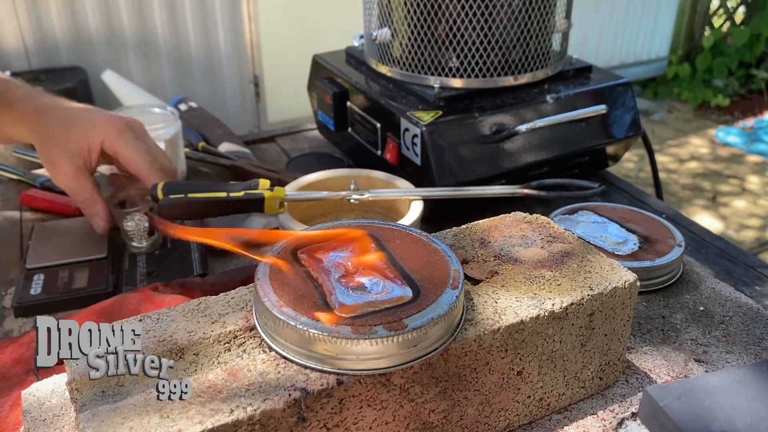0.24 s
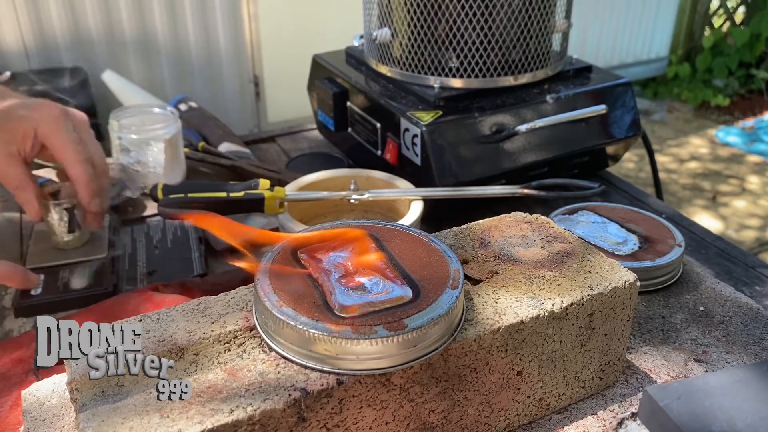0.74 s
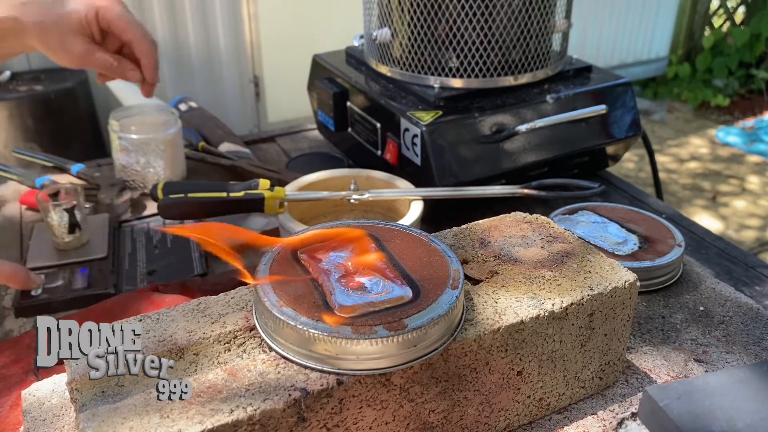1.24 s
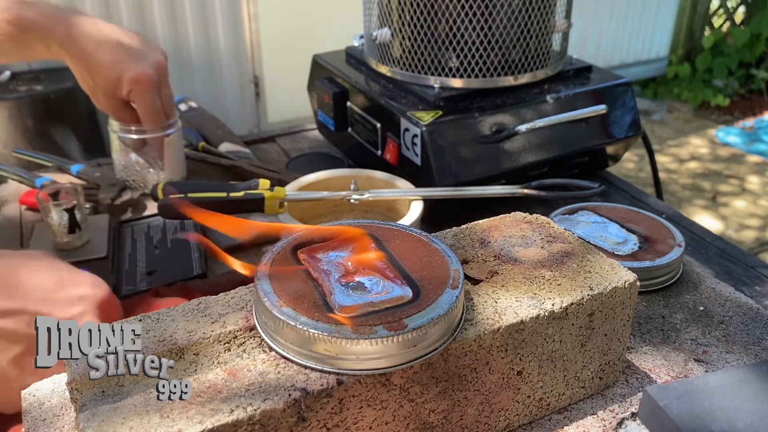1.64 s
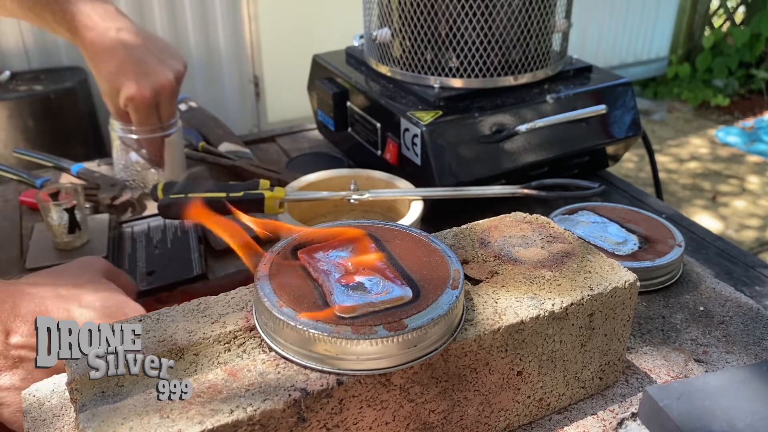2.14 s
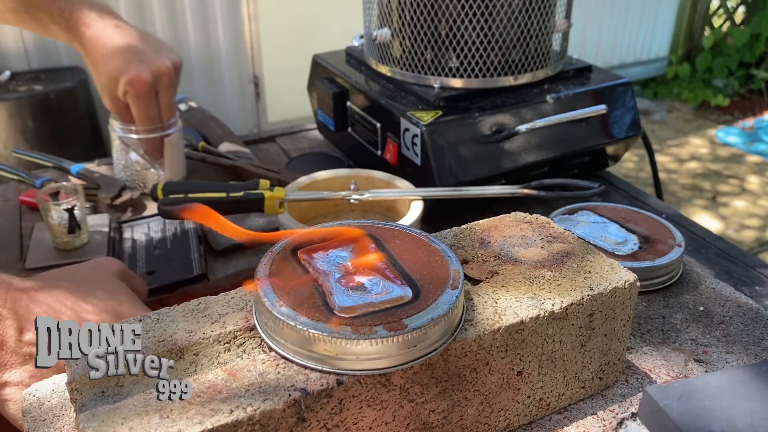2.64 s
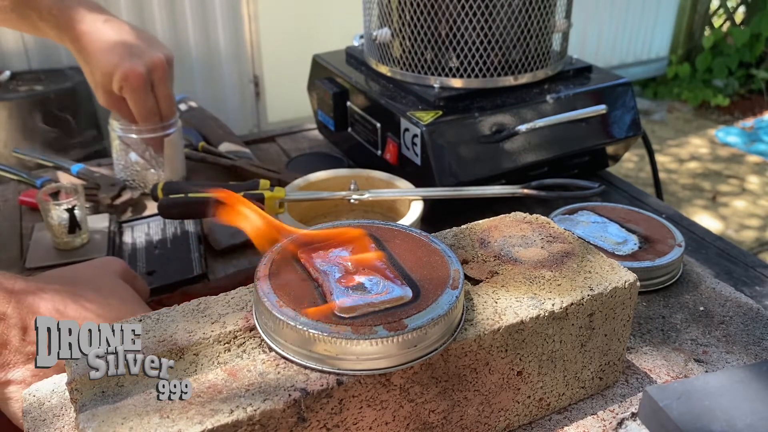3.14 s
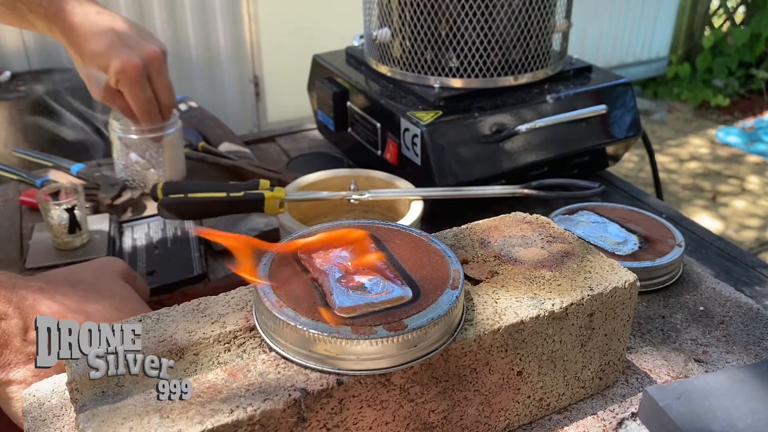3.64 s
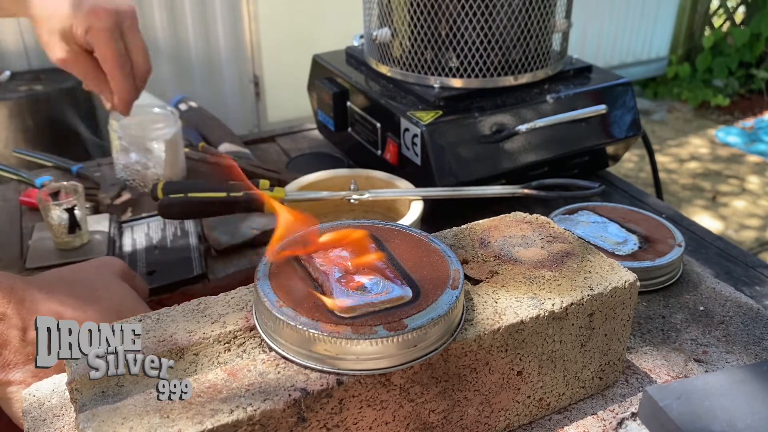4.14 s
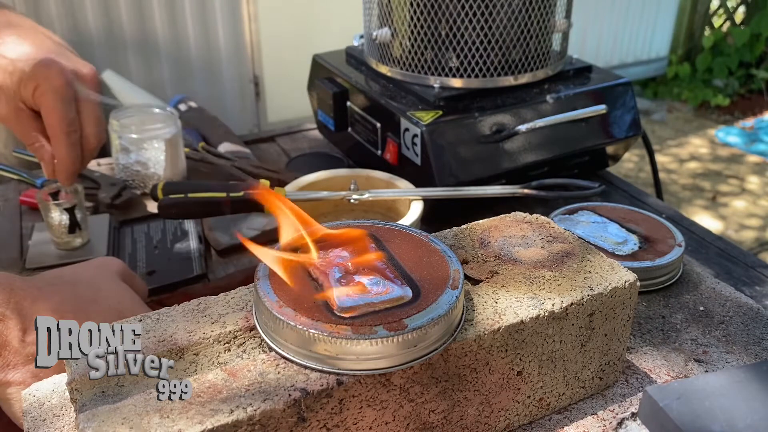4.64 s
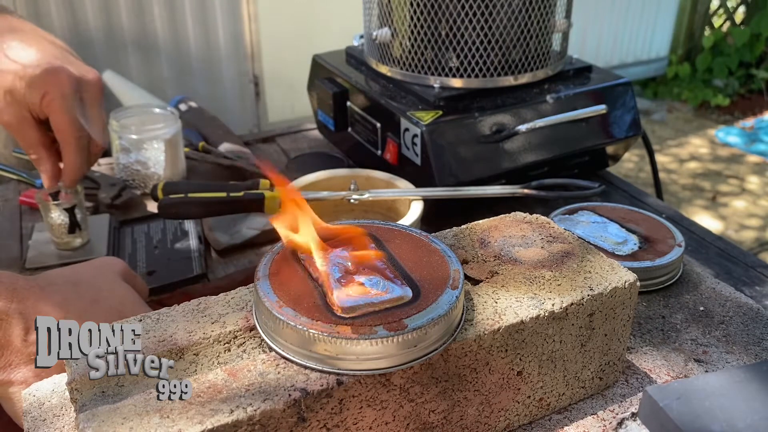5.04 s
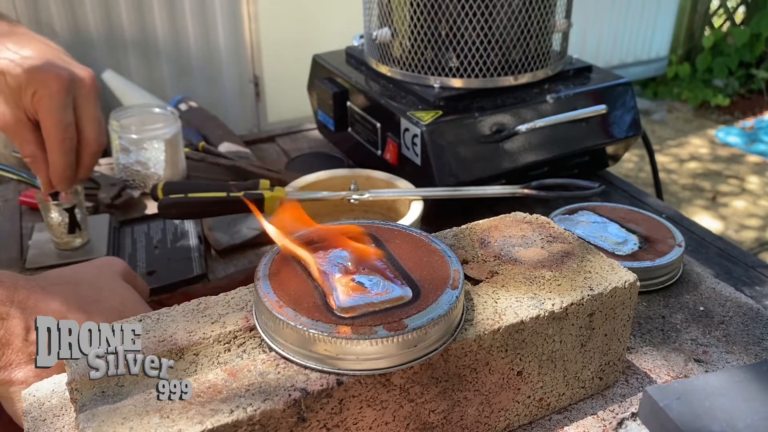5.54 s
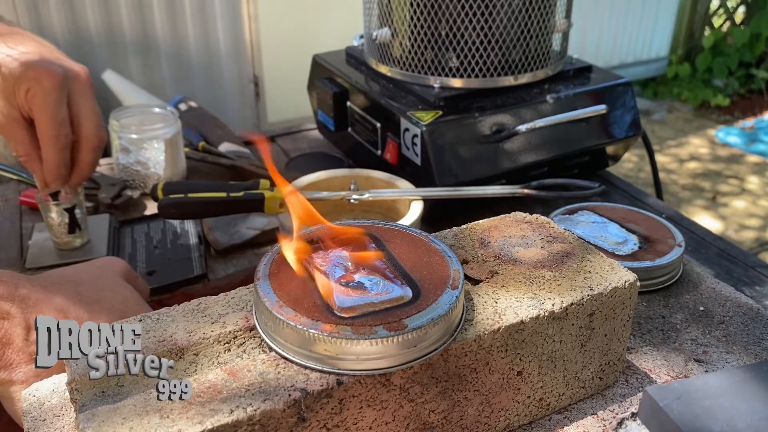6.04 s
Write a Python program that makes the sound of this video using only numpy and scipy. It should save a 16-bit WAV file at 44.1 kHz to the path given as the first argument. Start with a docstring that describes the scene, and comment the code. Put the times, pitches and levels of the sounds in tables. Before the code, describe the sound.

A loud, steady cicada drone fills a sunny yard while a hand bumps a table, sets down a jar, stirs metal grains, and a bird chirps.

```python
"""A cicada drones over a far chorus: rib clicks and noise shaped by a song spectrum and fine peaks. Beneath it
yard rumble and flame flutter are shaped noise, with a faint hiss, low hums (sines in narrow noise) and one
faint high noise band, perhaps a cricket. A hand bumps and leans on a table (dying sines), sets down a jar
(gritty contacts ringing its modes) and stirs metal grains (clumps of tiny rings, a dull scrape). A small bird
chirps in gliding whistles."""
import sys
import numpy as np
from scipy import signal
from scipy.fft import rfft, irfft, next_fast_len
from scipy.io import wavfile
from scipy.ndimage import uniform_filter1d

SR = 44100
rng = np.random.default_rng(int(sys.argv[2]) if len(sys.argv) > 2 else 0)


def to_wav(s):
    """Save 16-bit WAV."""
    ch = np.atleast_2d(s).T  # columns
    pcm = np.round(np.clip(ch, -1, 1) * 32767)  # PCM
    wavfile.write(sys.argv[1], SR, pcm.astype(np.int16))


N = 277723

# Yard rumble and flame flutter, common to both ports. Each row: pitch in Hz, relative dB per Hz.
RUMBLE_COMMON = [(20, -4), (45, -17), (75, -5.5), (110, -1.5), (170, -14.5), (215, -19), (400, -25),
                 (700, -27), (1000, -40), (2000, -49), (3500, -37), (4300, -55), (6000, -91)]
# The same, opposed in the two ports. Each row: pitch in Hz, relative dB per Hz.
RUMBLE_OPPOSED = [(20, -40), (60, -18), (110, -11.5), (250, -28), (500, -36), (850, -26), (1300, -37.5),
                  (2200, -65), (3000, -39.5), (4300, -50), (6000, -81)]
RUMBLE_RMS_DB, STEADY_BELOW_HZ = -51, 250  # patches fade out below this pitch

# Faint hiss before gusts. Each row: time in seconds, narrower band in dB rms, wider band in dB rms.
RUSTLE_LEVELS = [(0, -63, -62), (.5, -57.5, -67.5), (1.2, -64, -63), (2.3, -65, -63.5), (3.7, -59.5, -71.5),
                 (5.0, -65.5, -65.5), (6.3, -61, -69)]
GUST_DB, GUST_STEP_S = 2.5, .05

# Low hums and one faint high noise band, perhaps a cricket.
# Each row: pitch in Hz, noise width of the first pass in Hz, level in dB rms, sine weight (0: noise only).
HUMS_AND_BAND = [(59.64, 11.8, -50, 0.6), (85.9, 7, -57.5, 0.28), (119.2, 7.4, -49, 0.89),
                 (243.5, 2.9, -69.5, 0.57), (3863, 320, -74, 0)]

# Chirps. Each row: start in seconds, length in seconds, first Hz, turning Hz, last Hz,
# place of the turn (0-1), dB rms at the turn before tremble and echo, husk rms over tone rms.
BIRD_CHIRPS = [(0.364, 0.05, 1460, 1457, 1450, .5, -67, .9), (0.585, 0.05, 1330, 1320, 1350, .4, -64, 0.69),
               (1.363, 0.012, 2100, 2100, 2090, 0.5, -61, 1.2),
               (1.965, 0.057, 1560, 1545, 1520, 0.7, -62, 0.7),
               (4.932, 0.17, 1690, 1760, 1790, 0.45, -67.5, 0.67),
               (4.995, 0.11, 2380, 2400, 2350, 0.3, -62, 2.4),
               (5.124, .11, 2130, 2406, 2660, 0.37, -60.5, 1.2),
               (5.37, 0.014, 2250, 2280, 2300, .5, -63, 2.0),
               (5.577, 0.12, 2123, 2440, 2390, 0.55, -57, 0.47),
               (5.69, .1, 2420, 2300, 2230, .15, -67, 1.6), (5.875, 0.05, 2250, 2220, 2240, 0, -61, 2.2),
               (5.931, 0.067, 2260, 2340, 2270, 0.5, -59, 3),
               (6.032, 0.16, 1980, 2137, 2030, 0.45, -60, 0.63),
               (6.15, 0.19, 2050, 2018, 2020, .3, -64.5, 0.75)]
CHIRP_ENDS_DB = -12  # against the turn
TREMBLE_DB, TREMBLE_STEP_S = 1.6, .007
ECHO_DB, ECHO_T60_S = -5, .25
HUSK_HZ, HUSK_HZ_PER_SHARE = 60, 78  # the noisy edge spreads wider as it grows

# Table top modes. Each row: pitch in Hz, relative dB, t60 in seconds.
TABLE_MODES = [(100.1, -23, 0.2), (139.7, -24, 0.22), (168, -15, 0.17), (160, 14, 0.042), (271, -8, 0.068),
               (381, -12, 0.058), (474, -18, 0.053)]
# Table bumps. Each row: time at full strength in seconds, peak dB before panning, contact in seconds.
TABLE_BUMPS = [(0.0, -32, 0.00064), (0.785, -21, 0.0031), (1.07, -39, 0.0012), (1.097, -36, 0.0028),
               (1.316, -33.5, 0.0016), (1.508, -37, 0.0088), (1.671, -27, 0.0083), (1.837, -35.5, 0.0049),
               (1.948, -40, 0.0023), (2.05, -32, 0.0052), (2.097, -34.5, 0.0076), (2.179, -41, 0.0027),
               (2.289, -35, 0.0098), (2.737, -36.5, 0.0051), (3.19, -43, 0.0023), (3.593, -40, 0.00093)]
# Hands resting and shifting. Each row: time in seconds, dB rms before panning.
HAND_LEANING = [(1.2, -73), (1.4, -50), (1.93, -53), (2.3, -57), (2.88, -52.5), (3.3, -60), (3.9, -67),
                (4.1, -73)]

# Jar and cup modes. Each row: pitch in Hz, relative dB before tilt, t60 in seconds.
JAR_MODES = [(330, -4, .04), (420, -2, .05), (520, -3, .04), (650, -2, .06), (1280, -4, .015),
             (1650, -5, .012), (2400, -5, .012), (3450, -6, .01)]
# Knocks. Each row: start in seconds, peak dB of ring and clack together before panning, left-right dB,
# tilt in dB per octave, contact in seconds, clack Hz, clack width per pass in Hz, clack dB over the ring.
JAR_KNOCKS = [(0.576, -49, -1.0, -1, 0.0022, 2450, 700, 2), (0.769, -44.5, 6, -1, 0.023, 2740, 2800, 0),
              (0.773, -39.5, 5, -16, 0.009, 1300, 500, -18),
              (1.062, -32.5, 9, 1.5, 0.0021, 2900, 3200, 1.5),
              (1.067, -39, 0.5, -1, 0.016, 1600, 2600, -12), (1.3002, -38, 6, -4, 0.004, 1430, 1000, -8),
              (1.641, -53, 3, -6, 0.0047, 2900, 600, 4), (3.188, -50, 4, 3, 0.0049, 2000, 3500, -3),
              (3.599, -45, -3, -22, 0.0066, 1500, 2980, -11), (4.148, -42, -4, -16, 0.016, 2530, 800, -5),
              (4.169, -52, -1.0, -13, 0.01, 2260, 500, 3), (4.219, -50, -0.5, -5, 0.0044, 2330, 600, -3)]

# Finger strokes before panning. Each row: start in seconds, length in seconds, fizz dB, scrape dB.
FINGER_STROKES = [(0.195, 0.33, -63.5, -73), (1.964, 0.19, -54, -55.5), (2.25, 0.31, -57.5, -64.5),
                  (2.443, 0.24, -60.5, -70), (2.578, 0.33, -54.5, -63.5), (2.802, 0.24, -63, -64.5),
                  (4.127, 0.11, -77, -64), (4.988, 0.12, -62, -74), (5.35, 0.055, -70, -76),
                  (5.66, .1, -67, -77), (5.858, 0.15, -63, -81)]
STROKE_RISE, STROKE_FALL = 0.39, 0.52  # shares of the length
# Single grains. Each row: start in seconds, starting dB before panning, pitch in Hz.
GRAIN_TICKS = [(.252, -56, 3200), (2.0113, -64, 3500), (2.0392, -62, 3620), (2.291, -58, 2500),
               (2.2951, -56, 3730), (2.362, -55, 3800), (2.384, -50, 3970), (2.4323, -48, 3400),
               (2.5036, -53, 3850), (2.5421, -46.5, 3550), (2.6523, -54, 3900), (2.684, -61, 2450),
               (2.708, -57, 2850), (2.7795, -51, 3600), (2.8828, -56, 2880), (2.9257, -56, 3460),
               (2.9651, -62, 3450)]
TICK_T60_S, TICK_WIDTH_HZ = 0.057, 320  # width of each of two passes
GRAIN_LOW_HZ, GRAIN_HIGH_HZ, GRAIN_DECAY_CYCLES = 2000, 4500, 7.5

CYCLE_HZ = 116.25  # muscle cycles a second
# Clicks of a cycle; the second drum pushes against the first.
# Each row: place in the cycle (0-1), relative strength in dB, polarity bias before random flips.
RIB_CLICKS = [(.0, -9.5, 0.88), (0.251, -10.5, 0.83), (0.503, -21.5, -1.13), (0.752, -7, -0.71)]
# Broad song spectrum. Each row: pitch in Hz, relative dB per Hz.
SONG_SPECTRUM = [(4100, -82), (4600, -26), (5000, -28.5), (5450, -14.5), (6400, -12.5), (6700, -10),
                 (7000, -8.5), (7400, -14), (7900, -2), (8400, -13), (8900, -15), (9700, -18), (10500, -24),
                 (11000, -23.5), (11400, -44.5), (13500, -23), (15500, -28)]
# Fine peaks in the song spectrum. Each row: pitch in Hz, width in Hz before PEAK_WIDTH_FACTOR, relative dB
# before peaks_db, left lead in radians, left-right dB.
FINE_PEAKS = [(5125, 27, -16.6, 0.5, -2.9), (5243, 45, -16.9, -2.2, 3.1), (5469, 36, -1.9, 1.8, 1.4),
              (5577, 45, -3.2, -3.1, 4.7), (5706, 45, -0.7, -1.8, 2.2), (5932, 45, -4.2, -1.0, 2.8),
              (6158, 39, -5.0, 0.1, -2.5), (6331, 45, -6.1, -0.3, -4.6), (6385, 45, -4.9, 0.6, -6.8),
              (6557, 45, -9.1, 2.2, -1.7), (6869, 45, 0.0, -0.6, -6.0), (7084, 45, -2.5, 0.5, 7.7),
              (7235, 45, -9.8, -1.9, 2.8), (7450, 28, -8.6, -1.3, -5.2), (7623, 45, -4.5, -2.3, -0.5),
              (7720, 34, -4.3, -2.0, 0.7), (7849, 45, -1.2, -1.5, -0.1), (7967, 45, -4, -2.3, 0.9),
              (8005, 30, -2.5, -2.3, 0.5), (8280, 45, -8.0, -2.8, 1.6), (8463, 45, -5.6, 3.1, 2.1),
              (8549, 43, -6.6, 2.3, -0.7), (8592, 42, -5.6, 2.8, -2.3), (8872, 45, -6.6, 2.1, -1.8),
              (9098, 45, -11.3, 1.7, -2.7), (9205, 32, -12.8, 1.4, -2.1), (9550, 45, -9.3, 0.7, -0.8),
              (9679, 36, -13.0, 0.1, -0.3), (10078, 45, -15.7, 0.0, -0.0), (11900, 60, -21.0, 3.1, 0.0),
              (15030, 150, -19.0, -2.0, 0.0)]
# Pitches in Hz around which the song wavers independently.
WAVER_CENTRES_HZ = [5770, 6530, 8700, 9500]
# Slow song swell before levelling. Each row: time in seconds, whole song in dB,
# extra dB around the second waver pitch.
SONG_SWELL = [(0, 1.5, -2), (.9, 2, -3), (1.9, 1.5, -3), (3.15, 1.5, -0.5), (3.9, 2.5, -5.5),
              (4.67, 1.5, 0), (5.4, 1, -1.5), (6.3, 2.5, -3.5)]
SONG_RMS_DB, WAVER_DB, WAVER_STEP_S = -31, 0.64, 0.29
FAR_SHARE = .45  # power share of the smooth far chorus against near clicks
RIPPLE_DB, PEAK_WIDTH_FACTOR = 5.5, 1.15
PORT_DELAY_S, IN_PHASE_HZ = 2.53e-4, 10050  # right port leads; ports agree at this pitch

EDGE_HZ = 15700


def gain_of(db):
    """Amplitude factor of a level in dB."""
    return 10 ** (np.asarray(db) / 20)


def evened(x):
    """Scales to rms 1."""
    return x / np.sqrt(np.mean(x ** 2) + 1e-20)


def read(points, hz):
    """Spectrum in dB, joined over log pitch."""
    point_hz, db = np.transpose(points)
    return np.interp(np.log(hz + 1), np.log(point_hz + 1), db)


def curve(rows, column):
    """One table column joined over all samples."""
    rows = np.asarray(rows)
    return np.interp(np.arange(N) / SR, rows[:, 0], rows[:, column])


def slowly(rows, step_s):
    """Rows of normal random values, one every step, joined over all samples."""
    knots_s = np.arange(0, N / SR + 2 * step_s, step_s)
    values = rng.standard_normal((rows, len(knots_s)))
    return np.array([np.interp(np.arange(N) / SR, knots_s, row) for row in values])


def wander(hz, step_hz):
    """Normal random values, one every step, joined over pitch."""
    knots_hz = np.arange(0, SR / 2 + step_hz, step_hz)
    return np.interp(hz, knots_hz, rng.standard_normal(len(knots_hz)))


def add(mix, start_s, sound):
    """Adds a sound in place, cut at the end of the mix."""
    part = mix[..., round(start_s * SR):][..., :sound.shape[-1]]
    part += sound[..., :part.shape[-1]]


def resonate(x, hz, width_hz):
    """Shifts hz down to zero, smooths, and shifts back: a resonance of gain 1."""
    turn = np.exp(2j * np.pi * np.cumsum(hz * np.ones(len(x))) / SR)
    r = np.exp(-np.pi * width_hz / SR)
    smooth = signal.lfilter([1 - r], [1, -r], x / turn)
    return 2 * (turn * smooth).real


def ring(modes, tilt_db=0., rise_turns=.01):
    """Sum of dying sines, tilted per octave around 1 kHz; low ones build up later."""
    t = np.arange(SR // 4) / SR
    out = np.zeros(len(t))
    for hz, db, t60_s in modes:
        decay = gain_of(db + tilt_db * np.log2(hz / 1000) - 60 * t / t60_s)
        rise = 1 - np.exp(-(t * hz / rise_turns) ** 2)
        out += decay * rise * np.sin(2 * np.pi * hz * t)
    return out


def rumble(patchy_db=3.5):
    """Yard rumble and flame flutter: random short-time spectra with drifting patches."""
    frames, hz = N // 256 + 5, np.fft.rfftfreq(1024, 1 / SR)
    a, b, c, d, patches = rng.standard_normal((frames, 513, 5)).T
    patches = evened(uniform_filter1d(uniform_filter1d(patches, 8, 0), 10, 1))
    depth_db = patchy_db * np.minimum(hz / STEADY_BELOW_HZ, 1)[:, None]
    spectra = np.array([a + 1j * b, c + 1j * d]) * gain_of(depth_db * patches)
    spectra = spectra * gain_of([read(RUMBLE_COMMON, hz), read(RUMBLE_OPPOSED, hz)])[:, :, None]
    mid, side = signal.istft(spectra, nperseg=1024, noverlap=768)[1][:, :N]
    return gain_of(RUMBLE_RMS_DB) * evened(np.array([mid + side, mid - side]))


def rustle():
    """Faint gusty hiss: two wide noise bands, partly shared by the ports."""
    out = np.zeros((2, N))
    for column, hz, width_hz in [(1, 256, 640.0), (2, 250, 3300.0)]:
        shared, *own = rng.standard_normal((3, N))
        band = [resonate(resonate(shared + 1.63 * o, hz, width_hz), hz, width_hz) for o in own]
        level_db = curve(RUSTLE_LEVELS, column) + GUST_DB * slowly(1, GUST_STEP_S)[0]
        out += gain_of(level_db) * evened(np.array(band))
    return out


def hums_and_band():
    """Each is a band of noise around a sine, if its sine weight is above zero."""
    t = np.arange(N) / SR
    out = np.zeros(N)
    for hz, width_hz, db, sine_weight in HUMS_AND_BAND:
        noise = resonate(resonate(rng.standard_normal(N), hz, width_hz), hz, width_hz * 2)
        sine = np.sin(2 * np.pi * (hz * t + rng.random()))
        out += gain_of(db) * evened(2 * sine_weight * sine + evened(noise))
    return out


def bird():
    """A gliding whistle with a husky edge and unsteady strength, smeared by the yard's echo."""
    out = np.zeros(N)
    for start_s, length_s, first_hz, turn_hz, last_hz, turn, db, rough in BIRD_CHIRPS:
        u = np.arange(0, length_s, 1 / SR) / length_s
        turn = np.clip(turn, .05, .95)
        away = np.where(u < turn, 1 - u / turn, (u - turn) / (1 - turn))  # 0 at the turn, 1 at the ends
        hz = turn_hz + (np.where(u < turn, first_hz, last_hz) - turn_hz) * away
        spread_hz = HUSK_HZ + HUSK_HZ_PER_SHARE * rough
        husk = resonate(resonate(rng.standard_normal(len(u)), hz, spread_hz), hz, spread_hz)
        whistle = np.sqrt(2) * np.sin(2 * np.pi * np.cumsum(hz) / SR) + rough * evened(husk)
        strength = gain_of(db + CHIRP_ENDS_DB * away) * signal.windows.tukey(len(u), .4)
        add(out, start_s, strength * evened(whistle))
    out = out * gain_of(TREMBLE_DB * slowly(1, TREMBLE_STEP_S)[0])
    yard = rng.standard_normal((2, SR // 4)) * gain_of(-60 * np.arange(SR // 4) / SR / ECHO_T60_S)
    echo = signal.fftconvolve(out[None], yard / np.linalg.norm(yard[0]), axes=1)[:, :N]
    return out + gain_of(ECHO_DB) * echo


def table(lag_s=0.00067, build_s=0.00785):
    """Soft pushes and a shaky lean ring the table top; the shake reaches the left port first."""
    top = ring(TABLE_MODES, rise_turns=3.8)
    lean = signal.oaconvolve(rng.standard_normal(N), top)[:N]
    out = gain_of(curve(HAND_LEANING, 1)) * evened(lean)
    for full_s, db, contact_s in TABLE_BUMPS:
        push = np.hanning(int(np.clip(contact_s, 2e-4, .02) * SR) + 3)
        bump = np.convolve(top, push)
        add(out, max(full_s - build_s, 0), gain_of(db) * bump / abs(bump).max())
    t = np.arange(N) / SR
    return np.array([out, np.interp(t - lag_s, t, out)]) * gain_of([[.4], [-.4]])


def knocks(front=1.93, front_s=0.0001, settle=.25, hard_s=0.0034):
    """A short gritty contact with a hard front rings the jar and is heard itself as a dry clack."""
    out, t = np.zeros((2, N)), np.arange(2000) / SR
    for start_s, db, pan_db, tilt_db, contact_s, clack_hz, width_hz, clack_db in JAR_KNOCKS:
        swell = np.exp(-t / contact_s) * (1 - np.exp(-t / (settle * contact_s)))
        grit = rng.standard_normal(2000) * swell
        grit = grit + front * min(hard_s / contact_s, 1) * np.exp(-t / front_s)  # long contacts land softly
        knock = np.convolve(ring(JAR_MODES, tilt_db), grit)
        clack = resonate(resonate(grit, clack_hz, width_hz), clack_hz, width_hz)
        add(knock, 0, gain_of(clack_db) * abs(knock).max() * clack / abs(clack).max())
        knock = knock / abs(knock).max()
        add(out, start_s, gain_of(db) * knock * gain_of([[pan_db / 2], [-pan_db / 2]]))
    return out


def stirring(grains_per_s=3000.0):
    """Clumps of tiny grains, each ringing briefly at its own pitch, over a dull scrape; a few stand out."""
    size = gain_of(2.7 * np.minimum(rng.exponential(1, N), 5)) * rng.choice([-1., 1.], N)
    clumps = gain_of(2.4 * evened(uniform_filter1d(rng.standard_normal(N), 500)))
    grains = size * clumps * (rng.random(N) < grains_per_s / SR)
    kind = rng.integers(0, 24, N)
    t = np.arange(600) / SR
    fizz = np.zeros(N)
    for k, hz in enumerate(np.geomspace(GRAIN_LOW_HZ, GRAIN_HIGH_HZ, num=24)):
        grain_ring = hz ** 3.6 * t * np.exp(-t * hz / GRAIN_DECAY_CYCLES) * np.sin(2 * np.pi * hz * t)
        fizz += signal.oaconvolve(grains * (kind == k), grain_ring)[:N]
    fizz = evened(fizz)
    scrape = evened(resonate(rng.standard_normal(N), 696, 280.0))
    now_s, out = np.arange(N) / SR, np.zeros(N)
    for start_s, length_s, fizz_db, scrape_db in FINGER_STROKES:
        u = (now_s - start_s) / length_s
        stroke = np.clip(np.minimum(u / STROKE_RISE, (1 - u) / STROKE_FALL), 0, 1)
        out += stroke * (gain_of(fizz_db) * fizz + gain_of(scrape_db) * scrape)
    for start_s, db, hz in GRAIN_TICKS:
        tick = resonate(resonate(rng.standard_normal(600), hz, TICK_WIDTH_HZ), hz, TICK_WIDTH_HZ)
        add(out, start_s, gain_of(db - 60 * t / TICK_T60_S) * evened(tick))
    # the jar sits off to the left, so the right port hears it 3 samples later
    return np.array([out, np.roll(out, 3)]) * gain_of([[1.], [-1.]])


def clicks(length, drift_s, jitter_s, loose):
    """Rib clicks in a steady cycle that drifts a little; each differs in time, some in polarity."""
    place, db, sign = np.transpose(RIB_CLICKS)
    click_s = (np.arange(int(length / SR * CYCLE_HZ) - 1)[:, None] + place) / CYCLE_HZ
    late, flip, slow = rng.standard_normal((3,) + click_s.shape)
    drift = uniform_filter1d(uniform_filter1d(slow.ravel(), size=40), size=40)
    drift = evened(drift).reshape(click_s.shape)
    at = ((click_s + drift_s * drift + jitter_s * late) * SR).astype(int)
    out = np.zeros(length)
    # some ribs buckle the other way
    out[np.clip(at, 0, length - 1)] = gain_of(db) * np.sign(sign + loose * flip)
    return evened(out)


def port_paths(broad, hz, peaks_db):
    """Weak echoes comb the spectrum and fine peaks stand on it, each peak with its own lead between ports."""
    rippled = (broad * gain_of(RIPPLE_DB * wander(hz, 22.))) ** 2
    power = np.array([rippled, rippled])
    cross = rippled * np.exp(-2j * np.pi * PORT_DELAY_S * (hz - IN_PHASE_HZ) * (hz > 7400))
    for peak_hz, width_hz, db, lead_rad, pan_db in FINE_PEAKS:
        offset = 2 * (hz - peak_hz) / (PEAK_WIDTH_FACTOR * width_hz)
        peak = (gain_of(db + peaks_db) / (1 + offset ** 2)) ** 2
        power = power + peak * gain_of([[pan_db], [-pan_db]])
        cross = cross + peak * np.exp(1j * lead_rad)
    return np.sqrt(power) * np.array([np.ones(len(hz)), np.exp(-1j * np.angle(cross))])


def wavering(song):
    """Swells the whole song and lets its registers waver independently, then sets rms 1."""
    f, t, z = signal.stft(song, SR, nperseg=512)
    at = np.minimum(t * SR, N - 1).astype(int)
    level_db = WAVER_DB * slowly(len(WAVER_CENTRES_HZ), WAVER_STEP_S)[:, at]
    level_db = level_db + curve(SONG_SWELL, 1)[at]
    level_db[1] += curve(SONG_SWELL, 2)[at]
    share = np.array([np.interp(f, WAVER_CENTRES_HZ, one) for one in np.eye(len(WAVER_CENTRES_HZ))])
    share = share / (1 + (f / 10800) ** 20)  # the highest treble stays steady
    return evened(signal.istft(z * gain_of(share.T @ level_db), SR, nperseg=512)[1][:, :N])


def cicadas(spread_s=0.0015, apart=0.61, peaks_db=6.0):
    """Near clicks plus a far smooth chorus pass the song spectrum, the fine peaks and both ports."""
    length = next_fast_len(N + SR)
    hz = np.fft.rfftfreq(length, 1 / SR)
    hiss = rng.standard_normal((3, length))
    near = clicks(length, drift_s=1e-4, jitter_s=6e-5, loose=2.5)
    drive = rfft(np.sqrt(1 - FAR_SHARE) * near + np.sqrt(FAR_SHARE) * hiss[0])
    # each band arrives by its own path: a wandering delay over pitch
    drive = drive * np.exp(-2j * np.pi * np.cumsum(spread_s * wander(hz, 352.6)) * hz[1])
    broad = gain_of(read(SONG_SPECTRUM, hz))
    song = drive * port_paths(broad, hz, peaks_db)
    # singers from other sides are unrelated in the two ports, and duller
    others = apart * broad * rfft(hiss[1:]) * (1.33 + 1 / (1 + (hz / 9000) ** 4))
    both = irfft(song + others, length)[:, SR // 2:][:, :N]
    return gain_of(SONG_RMS_DB) * wavering(both)


def scene():
    """All sources summed in two ports."""
    return rumble() + rustle() + hums_and_band() + bird() + table() + knocks() + stirring() + cicadas()


def record(dry):
    """The band limit: a steep low-pass at EDGE_HZ."""
    lowpass = signal.firwin(1023, EDGE_HZ, window=("kaiser", 9), fs=SR)
    return signal.oaconvolve(dry, lowpass[None], "same")


dry = scene()
out = record(dry)
to_wav(out)
```